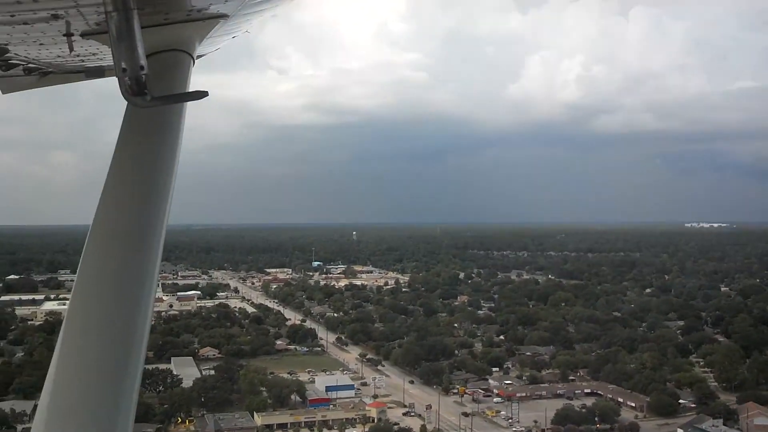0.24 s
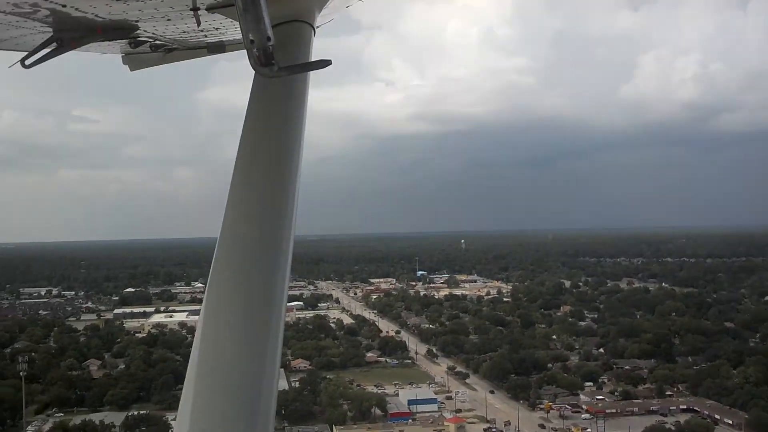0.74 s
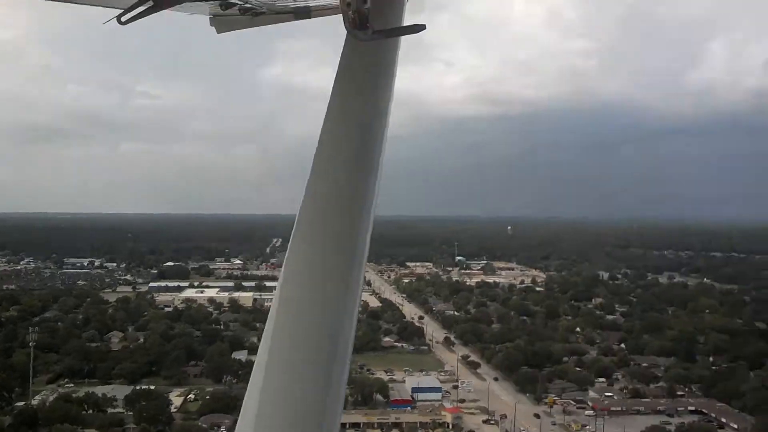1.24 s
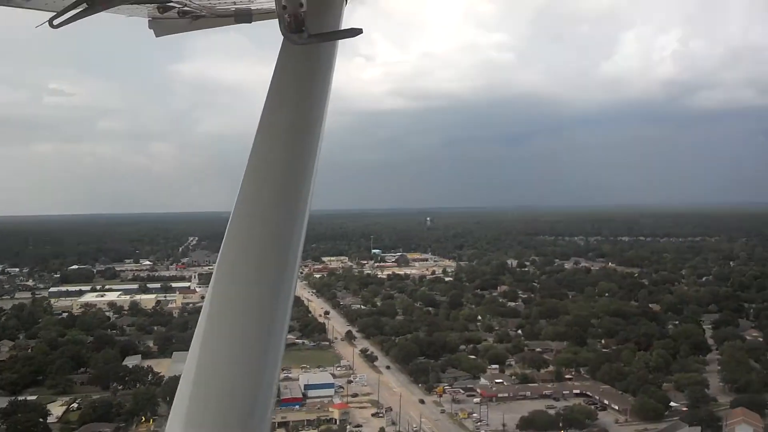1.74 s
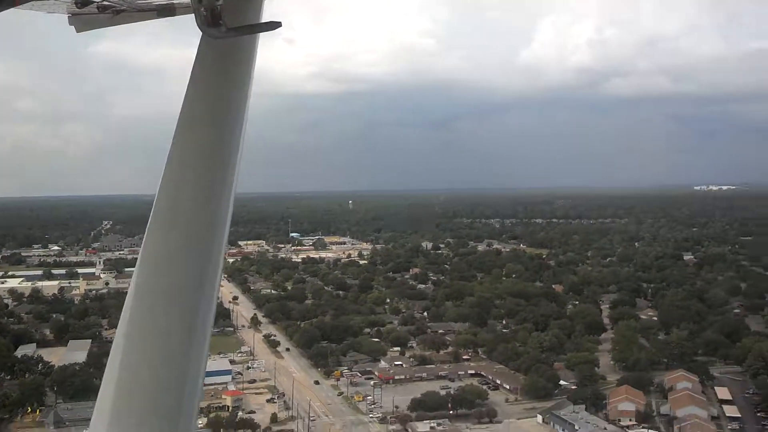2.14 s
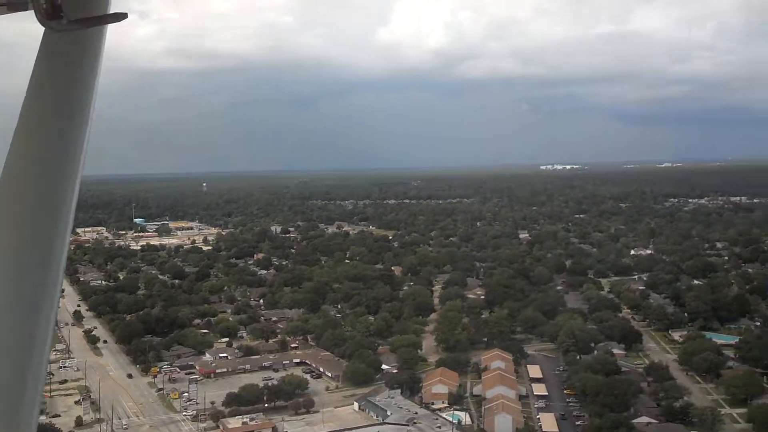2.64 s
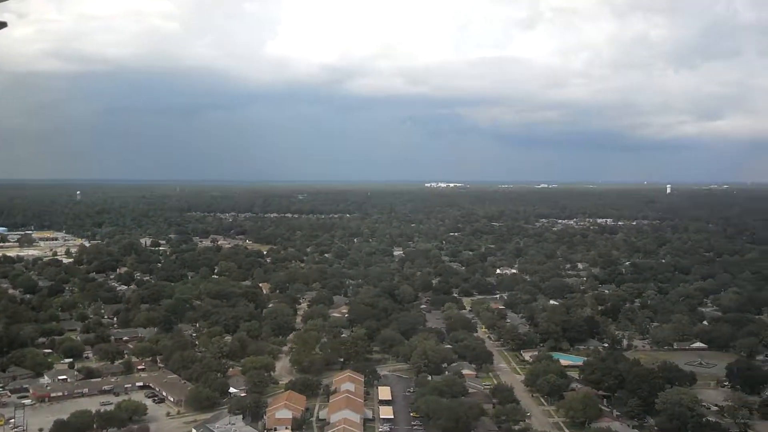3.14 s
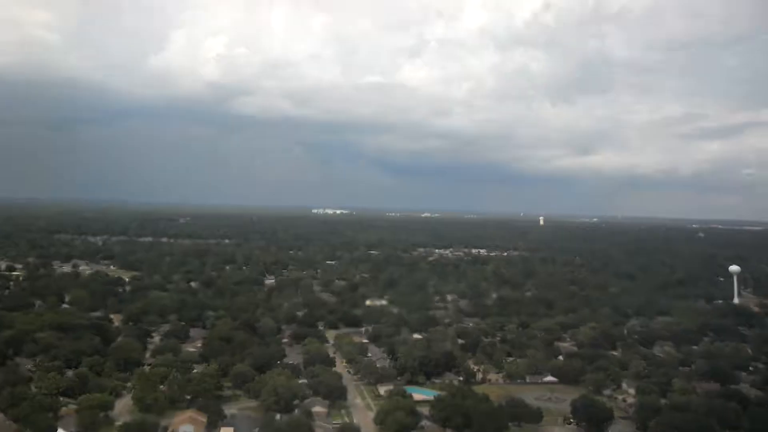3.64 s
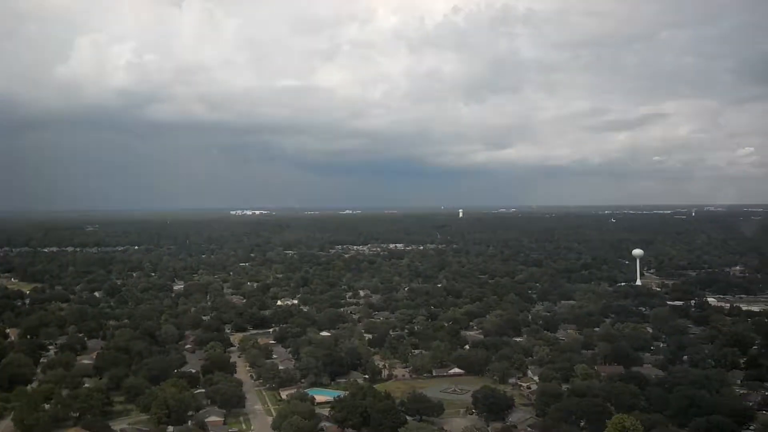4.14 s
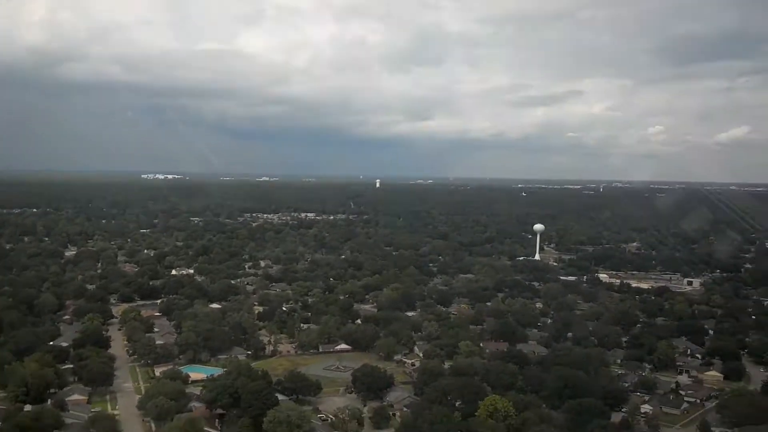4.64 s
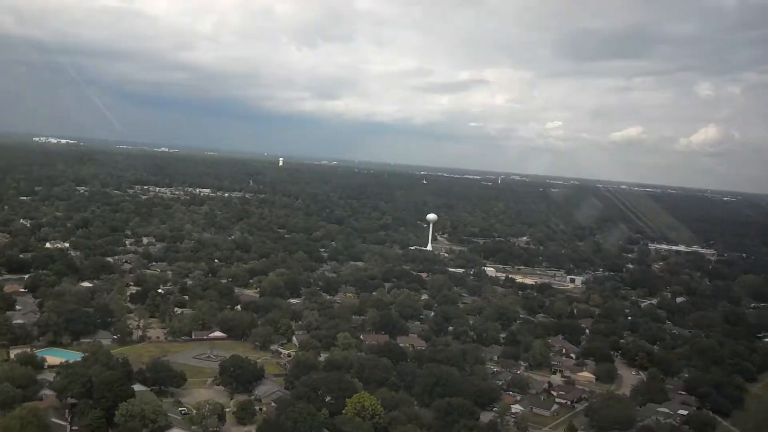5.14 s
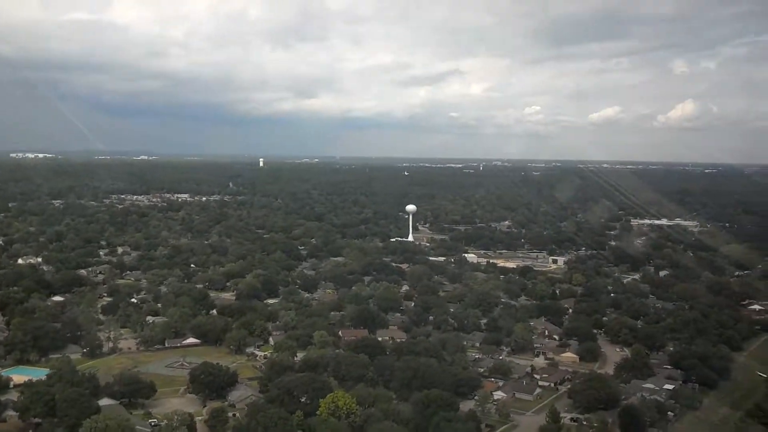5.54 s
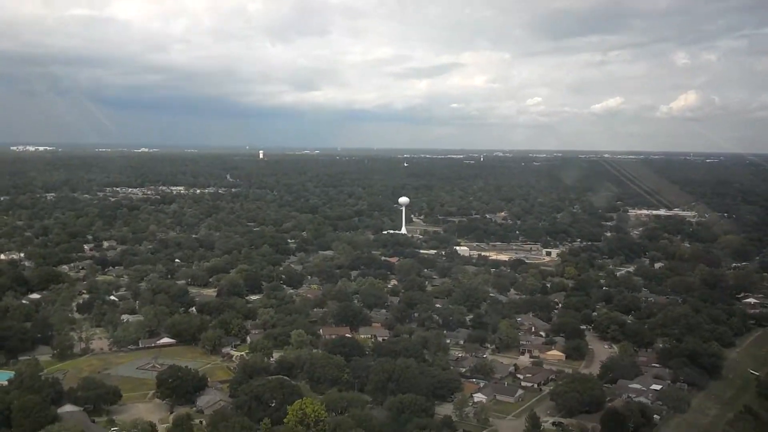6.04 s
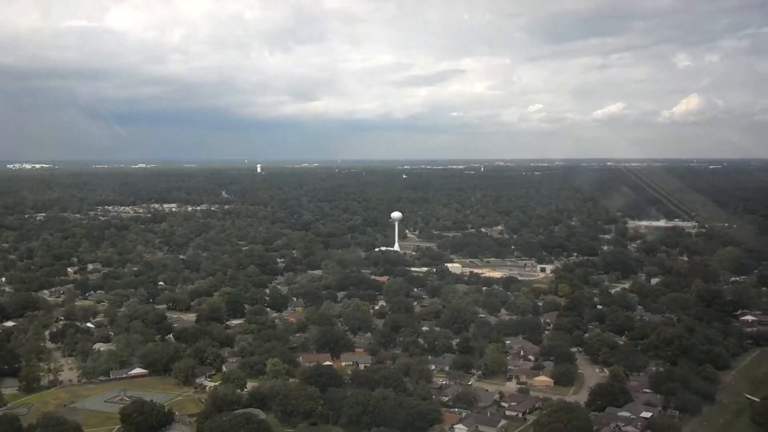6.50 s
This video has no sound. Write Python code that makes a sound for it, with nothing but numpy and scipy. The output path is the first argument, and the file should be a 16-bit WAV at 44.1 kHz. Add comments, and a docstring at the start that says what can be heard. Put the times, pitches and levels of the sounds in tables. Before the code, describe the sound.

A light aircraft cruises, heard from within: dense, low engine and propeller hum, slightly throbbing, with several wavering harmonics. Wind rushing over the fuselage makes a rough, continuous mid-range roar that flickers in strength, and panels ring softly through it. A small handheld stereo microphone adds faint high hiss. The drone is already running at the start and ends on a hard cut.

```python
"""A four-cylinder engine and two-blade propeller drone in a light aircraft's cabin, in cruise, as sums of cosines on
multiples of the engine cycle. Air rushes over the skin as diffuse noise in gusting half-octave bands, panels ring
near 1 kHz as narrow noise, and the microphones hiss. A handheld camera slowly turns: its two spaced ports are
subtracted from each other with a delay to face left and right. The sound ends on a cut."""
import sys
import numpy as np
from scipy import signal
from scipy.fft import rfft, irfft, next_fast_len
from scipy.io import wavfile
from scipy.ndimage import uniform_filter1d

SR = 44100
rng = np.random.default_rng(int(sys.argv[2]) if len(sys.argv) > 2 else 0)


def wrap_up_sound(samples):
    """Save the sound to the file named by the first command line argument, as 16-bit audio."""
    columns = np.atleast_2d(samples).T
    # keep every value between -1 and 1, then stretch to whole-number steps
    tamed = np.clip(columns, -1, 1)
    steps = np.round(tamed * 32767).astype(np.int16)
    wavfile.write(sys.argv[1], SR, steps)


N = 298568  # samples

# Firing and blade tones, louder or softer as the camera moves through the cabin. Each row: multiple of the
# firing rate, lag of the left port in ms before the turn, left port louder in dB, level curve [(s, dB)].
FIRING_TONES = [(2, .02, 0.0, [(0, -26), (.4, -23.5), (.85, -28.5), (1.2, -23.5), (1.8, -28.5),
                (2.4, -25.5), (2.95, -31), (4.7, -28.5), (5.35, -25), (5.7, -31), (6.1, -27.5)]),
                (3, .07, 2, [(0, -30.5), (.5, -26), (1.4, -28.5), (2.15, -26), (2.85, -31), (3.7, -28),
                (4.3, -29.5), (6.1, -28)]), (4, .01, 2.5, [(0.2, -34), (.5, -24), (.87, -32.5),
                (1.04, -23.5), (1.25, -40), (1.6, -32.5), (2.1, -23), (2.85, -25.5), (3.2, -23.5),
                (4.45, -24), (4.75, -26.5), (5.4, -22.5), (5.7, -25.5), (6, -23.5)]),
                (5, .08, 1.5, [(0, -35.5), (1.3, -37.5), (2.3, -32.5), (2.95, -35), (3.7, -28.5),
                (5.35, -29.5), (5.7, -39), (5.95, -30)]), (6, 0.15, -0.7, [(.1, -27), (.62, -38),
                (.95, -29.5), (1.9, -30), (2.95, -42), (3.6, -29.5), (4.15, -37.5), (4.6, -28), (5.05, -27),
                (5.65, -40.5), (5.9, -32), (6.1, -42)])]
# Weaker engine tones: the firing rate itself, its higher multiples, and the multiples of the four-stroke cycle
# between them. Each row: multiple of the cycle rate (played at the nearest whole number), level in dB before
# it wavers, lag of the left port in ms before the turn.
CYCLE_TONES = [(4, -47.5, .35), (5, -49, .05), (6, -47.5, .05), (7, -45, .05), (9, -43.5, .05),
               (10, -40, .08), (14, -42, 0.055), (15, -45.5, .05), (18, -39, 0.19), (19, -45.5, 0.036),
               (21, -40.5, .05), (22, -35, .12), (24.9, -48.5, .08), (28, -45.5, .1), (29, -39, 0.1),
               (29.9, -46.5, .05), (32, -39.5, 0.033), (36, -41.5, 0.057), (46, -53.5, 0.084),
               (48, -37.5, 0.16), (49, -41, 0.042), (52, -39, .05), (56, -37, .02), (69.3, -45.5, .02),
               (75.8, -43, .02)]
# How far the camera faces across the cabin. Each row: time in seconds, factor on the lags.
CAMERA_TURN = [(0, 1.05), (1.9, 1.9), (2.3, .8), (4, 0.64), (5, 0.55), (6.1, 0.91)]


def engine():
    """Fourier series of a periodic source: partials of the cycle, each reaching the two ports at its own lag."""
    firing_hz = firing_rate()
    cycle_phase = engine_cycle(firing_hz)
    partials = []
    for multiple, lag_ms, left_db, level in FIRING_TONES:
        # four firings make one cycle
        partials.append((4 * multiple, curves(level)[0] + 1.2 * walk(5), lag_ms, left_db))
    for multiple, level_db, lag_ms in CYCLE_TONES:
        partials.append((multiple, level_db + 2.33 * walk(2.964), lag_ms, 0))

    across = curves(CAMERA_TURN)[0]
    ports = 0
    for multiple, level_db, lag_ms, left_db in partials:
        # the cabin scatters the phases of the pulse and lets them sway
        scatter = 0.95 * rng.standard_normal()
        sway = .015 * multiple * walk(5)
        phase = round(multiple) * cycle_phase + scatter + sway
        half_lag = np.pi * round(multiple) * firing_hz / 4 * lag_ms * across / 1000  # radians
        port_phase = phase + np.array([-half_lag, half_lag])
        port_db = level_db + np.array([[left_db], [-left_db]]) / 2
        ports = ports + np.sqrt(2) * undb(port_db) * -np.cos(port_phase)
    return ports


# Engine speed. Each row: time in seconds, firing rate in Hz.
ENGINE_SPEED = [(0, 79.43), (2.2, 79.52), (2.9, 79.86), (4.2, 79.74), (6.1, 79.67)]


def firing_rate():
    """Periodic excitation: the firing rate in Hz sets the pitch of every engine partial."""
    return curves(ENGINE_SPEED)[0]


def engine_cycle(firing_hz):
    """Phase as the integral of frequency: radians of the four-stroke cycle, which spans four firings."""
    return 2 * np.pi * np.cumsum(firing_hz / 4) / SR


# Spectrum of the air rush at a port. Each row: frequency in Hz, relative density in dB per Hz.
RUSH_SPECTRUM = [(30, -18.5), (72, -23), (98, -1.5), (140, 1.5), (270, 0.5), (460, 4.5), (540, -1),
                 (800, 0), (1100, -1.5), (1450, -3), (2400, -5.5), (3300, -8.5), (4800, -14.5), (7600, -14)]
# Cabin resonances and dips in the rush. Each row: frequency in Hz, width in Hz, gain in dB.
CABIN_RESONANCES = [(798, 81, -4), (1056, 63, 1.5), (1280, 100, 3.5), (1615, 92, 6), (1840, 440, -0.5),
                    (2440, 550, 3), (2780, 200, -6.5), (4360, 540, 4.5)]
BASS_DB, BASS_STEADY = -2.04, .4  # bass against the rest, and the share of the gusts that it ignores


def rush(rush_db, gust_db):
    """Broadband flow noise: half-octave bands flicker alone, and the propeller wash modulates the lower ones."""
    size = next_fast_len(N)
    hz = np.fft.rfftfreq(size, 1 / SR)
    resonance_db = sum(db / (1 + (2 * (hz - f) / width) ** 2) for f, width, db in CABIN_RESONANCES)
    colour = shape(RUSH_SPECTRUM, hz) * undb(resonance_db) / (1 + (hz / 11000) ** 4)
    field = diffuse(hz, spacing_ms=0.36, lean=0.21) * colour
    # the level is that of the noise from 520 to 900 Hz
    unit = np.std(irfft(field[0] * ((hz > 520) & (hz < 900)), size))

    cycle = engine_cycle(firing_rate())
    throb = 0.039 * np.sin(cycle) + 0.042 * np.sin(2 * cycle) + 0.098 * np.sin(4 * cycle)
    half_octave = 2 * np.log2(hz / 45 + 1e-9)  # band 0 is centred on 45 Hz
    ports = 0
    for band in range(18):
        share = np.clip(1 - np.abs(half_octave - band), 0, 1)  # triangles that overlap
        bass = np.clip((11 - band) / 3, 0, 1)
        band_db = rush_db + bass * (BASS_DB - BASS_STEADY * gust_db) + 0.75 * walk(6)
        wash = 1 + np.clip((13 - band) / 3, 0, 1) * throb
        noise = irfft(field * share, size)[:, :N] / unit
        ports = ports + wash * undb(band_db) * noise
    return ports


# Panels rung by the air. Each row: frequency in Hz, width in Hz, level curve at the mean rush level [(s, dB)].
PANEL_RINGS = [(971, 76, [(0, -33.5), (1.2, -36), (2.25, -29.5), (2.9, -33.5), (3.2, -29), (4.5, -31.5),
               (6.1, -37.5)]), (1114, 58, [(0, -36.5), (.9, -25), (1.4, -33), (2.25, -28.5), (2.5, -39.5),
               (3.6, -32.5), (3.85, -37), (4.05, -27.5), (4.3, -33.5), (5.5, -42), (6.1, -41.5)])]
PANEL_SWING = 1.2  # dB of panel ring per dB of gust


def panels(gust_db):
    """Forced resonance: noise passes a narrow peak at each panel's frequency and swells with the gusts."""
    size = next_fast_len(N)
    hz = np.fft.rfftfreq(size, 1 / SR)
    ports = 0
    for f, width, level in PANEL_RINGS:
        peak = 1 / (1 + (2 * (hz - f) / width) ** 2)
        ring = irfft(diffuse(hz, spacing_ms=0.091, lean=.3) * peak, size)[:, :N]
        ring_db = curves(level)[0] + PANEL_SWING * gust_db + .8 * walk(5)
        ports = ports + undb(ring_db) * ring / np.std(ring)
    return ports


# Gusting of the air rush. Each row: time in seconds, level at the ports in dB.
AIR_LEVEL = [(.05, -28.5), (.25, -30.5), (.55, -26), (.66, -32.5), (.95, -28.5), (1.25, -30.5), (1.5, -26),
             (1.65, -30), (1.85, -28), (2.25, -26.5), (2.4, -30), (2.75, -27.5), (2.9, -28), (3.6, -26.5),
             (4.15, -28), (4.45, -26), (4.7, -29), (4.95, -26.5), (5.2, -29), (5.45, -27.5), (5.75, -29),
             (6.05, -26.5)]


def air():
    """Superposition of flow noise and the panels it drives, both following the same gusts."""
    rush_db = uniform_filter1d(curves(AIR_LEVEL)[0], size=2000)  # corners rounded
    gust_db = rush_db - np.mean(rush_db)
    return rush(rush_db, gust_db) + panels(gust_db)


def diffuse(hz, spacing_ms, lean):
    """Spatial coherence of a diffuse field: two port spectra alike in the bass, unrelated in the treble."""
    a, b = rng.standard_normal((2, len(hz))) + 1j * rng.standard_normal((2, len(hz)))
    alike = np.sinc(2 * hz * spacing_ms / 1000)
    # long waves run mostly along the cabin, square to the pair
    alike = 1 - (1 - alike) * np.clip((hz / 1400 + .1) ** 0.71, 0, 1)
    # more of the bass comes from the right, so part of the difference is the sum a quarter cycle late
    lean = np.clip(lean, 0, 1) * np.clip(alike, 0, 1) ** 0.51
    both = a * np.sqrt(1 + alike)
    apart = (np.sqrt(1 - lean ** 2) * b - 1j * lean * a) * np.sqrt(1 - alike)
    return np.array([both + apart, both - apart]) / 2


def undb(db):
    """Logarithmic level: amplitude gain of a level in dB."""
    return 10 ** (np.asarray(db) / 20)


def curves(table):
    """Linear interpolation: the columns after the time, one value per sample."""
    s, *columns = np.transpose(table)
    return [np.interp(np.arange(N) / SR, s, c) for c in columns]


def walk(rate):
    """Smoothed random modulation: levels held 1 / rate s and slewed twice; spread near 0.8."""
    k = int(SR / rate)
    held = np.repeat(rng.standard_normal(N // k + 1), k)
    return 1.11 * uniform_filter1d(uniform_filter1d(held, k), k)[:N]


def shape(table, hz):
    """Spectral envelope: gain at each frequency, with dB interpolated over log frequency."""
    f, db = np.transpose(table)
    return undb(np.interp(np.log(hz + 1), np.log(f), db))


def scene():
    """Superposition: sound pressures of engine and air add at the two ports."""
    return engine() + air()


# Hiss of the microphones, rising to their resonance. Each row: frequency in Hz, density in dB per Hz.
MICROPHONE_HISS = [(500, -110), (4000, -75.5), (8000, -75.5), (10500, -82.5), (13000, -68), (15500, -66)]
PORT_LAG = 16  # samples between the ports
END_S, TOP_HZ = 6.1100, 15750  # time of the cut, upper band limit


def record(dry):
    """Pressure-gradient pickup: each port minus the other one delayed; an integrator restores the bass."""
    size = next_fast_len(N)
    hz = np.fft.rfftfreq(size, 1 / SR)
    hiss_spectrum = rfft(rng.standard_normal((2, size))) * shape(MICROPHONE_HISS, hz) * np.sqrt(SR / 2)
    hiss = irfft(hiss_spectrum, size)[:, :N]
    ports = (dry + hiss) * undb([[-.45], [.45]])  # the two capsules differ a little
    other_late = np.pad(ports[::-1], ((0, 0), (PORT_LAG, 0)))[:, :N]
    leak = np.exp(-2 * np.pi * 60 / SR)  # integrates above 60 Hz
    sides = signal.lfilter([1 / PORT_LAG], [1, -leak], ports - other_late)
    sides = signal.sosfilt(signal.butter(2, 72, "high", fs=SR, output="sos"), sides)  # wind cut
    sides = sides * np.clip((END_S - np.arange(N) / SR) / 0.00054, 0, 1)
    return signal.sosfilt(signal.ellip(10, .2, 80, TOP_HZ, fs=SR, output="sos"), sides)


dry = scene()
out = record(dry)
wrap_up_sound(out)
```